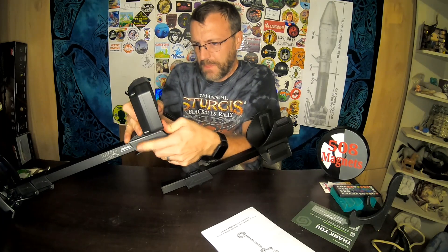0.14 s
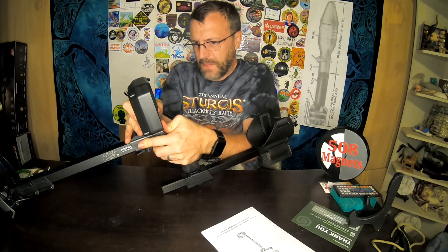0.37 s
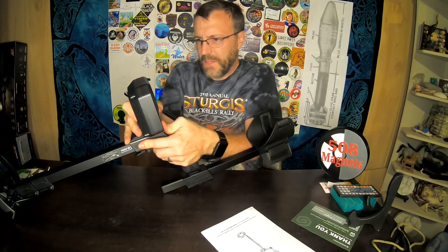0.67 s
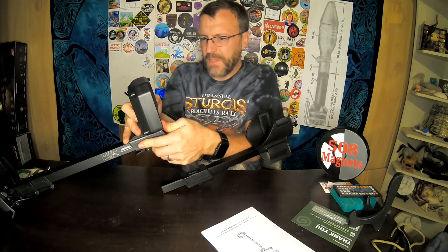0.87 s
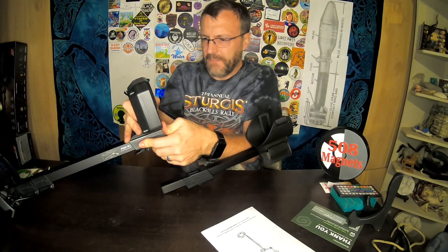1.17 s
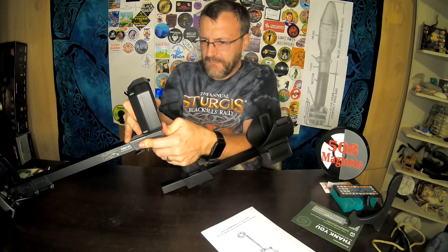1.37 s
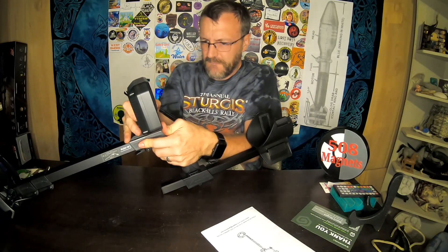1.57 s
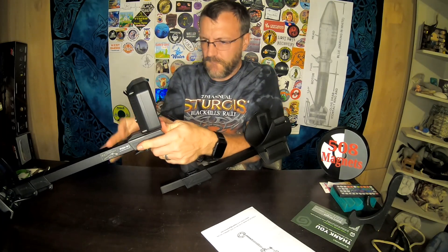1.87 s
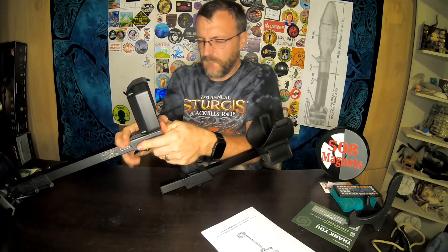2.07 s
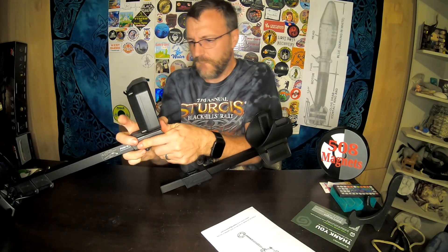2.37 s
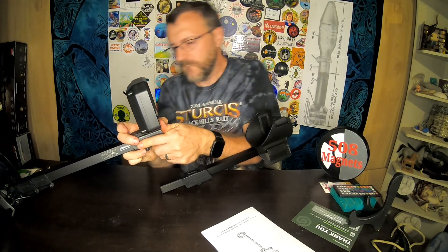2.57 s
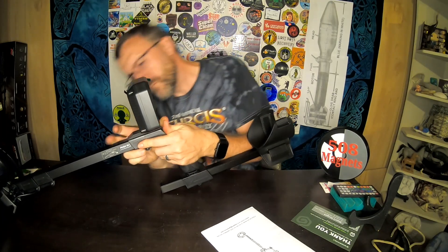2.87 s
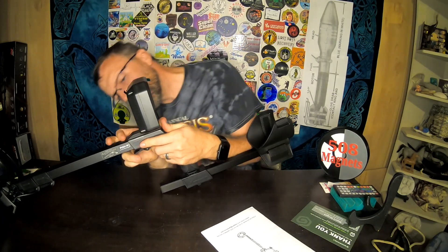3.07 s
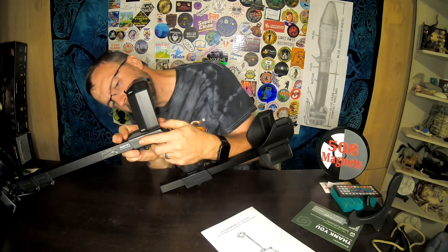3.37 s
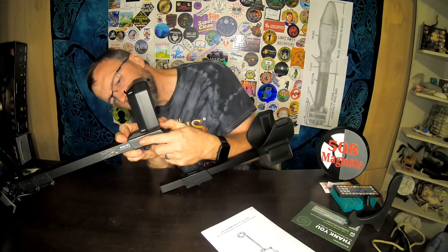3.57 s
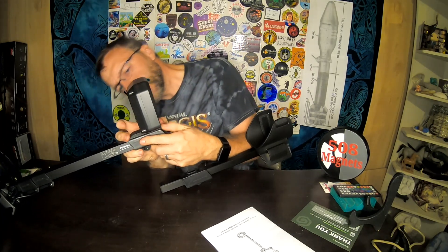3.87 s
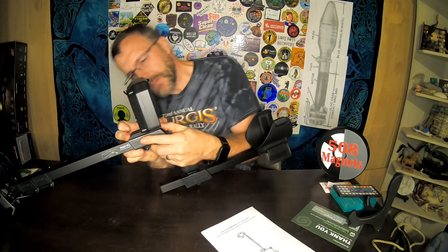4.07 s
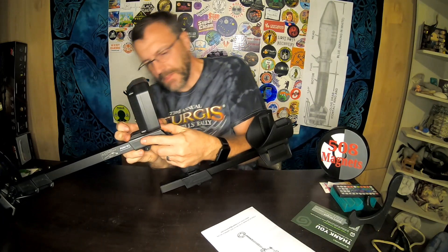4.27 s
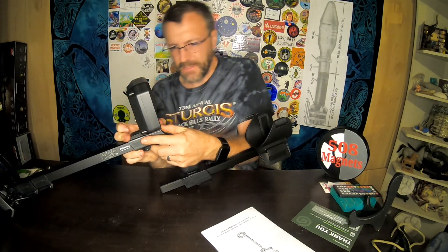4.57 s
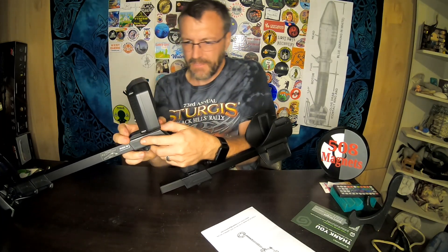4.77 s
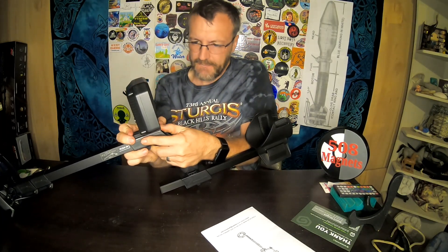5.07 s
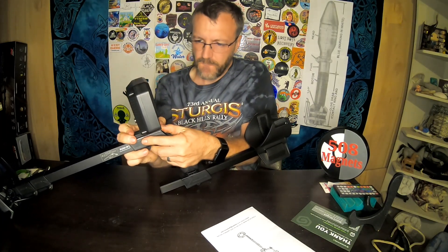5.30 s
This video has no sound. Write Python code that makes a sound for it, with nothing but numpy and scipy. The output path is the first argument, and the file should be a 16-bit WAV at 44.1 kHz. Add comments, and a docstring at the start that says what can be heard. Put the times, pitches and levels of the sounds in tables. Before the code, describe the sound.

Close stereo pickup of a small, quiet room with a short tail, faint noise floor and uneven low rumble. Hands work a hard plastic housing along a shaft above a wooden desk. Faint ticks begin at 0.1 s, with a soft dull desk bump and scuff around 0.35 s. Bright plastic snaps hit at 0.53-0.55 s, and another at 0.71 s. Sparse light clicks and grainy finger rubbing follow from 0.9 to 1.8 s. At 2.07-2.35 s the shell creaks in a rapid stutter of tiny clicks, with skin hiss and a low desk hum. Small ticks and rubs cluster from 2.4 to 3 s, then a brighter scuff at 3.05 s. A very brief, faint squeak comes near 3.4 s, followed by little taps and catches until 4 s. At 4.2 s a loud woody knock with a plastic snap dominates. Faint ticks, drags and desk touches continue from 4.7 to about 5.3 s.

```python
"""A small quiet room: hands work a hard plastic housing along a shaft above a wooden desk.
The shell ticks, snaps and creaks as short bursts of ringing modes, each tapping the desk; one desk knock is loud.
Fingers rub over the plastic as patchy hiss, with a brief squeak and grainy drags; each push makes the desk hum.
A close pair of microphones hears it with a short room tail, over a low rumble and a faint noise floor."""
import sys
import numpy as np
from scipy import signal
from scipy.fft import rfft, irfft
from scipy.io import wavfile
from scipy.ndimage import uniform_filter1d

SR = 44100
rng = np.random.default_rng(int(sys.argv[2]) if len(sys.argv) > 2 else 0)


def digitize_waveform(pressure):
    """Quantize a signal to 16-bit integers and store it at the path in sys.argv[1].

    Rows of a 2-D input are taken as channels; values are limited to [-1, 1].
    """
    field = np.atleast_2d(pressure).T
    bounded = np.clip(field, -1, 1)
    quanta = np.round(bounded * 32767).astype(np.int16)
    wavfile.write(sys.argv[1], SR, quanta)


def volts(x):
    """Linear amplitude factor 10**(x/20) for a level x in dB, scalar or array-like."""
    e = np.asarray(x, float) / 20
    return 10 ** e


N = 239771  # length in samples

# ringing modes of the plastic shell: pitch_hz, relative level_db, t60_s of a free ring
SHELL_MODES = [(1300, -2, .018), (2150, -2, .007), (2620, -1, .009), (3250, -4, .006), (4000, -4, .006),
               (4800, -3, .006), (5700, -9, .004), (6700, -10, .005), (9700, -20, .004)]
# ringing modes of the desk top: pitch_hz, relative level_db, t60_s of a struck ring
DESK_MODES = [(52.5, -6.5, 0.083), (84.7, -7.5, 0.11), (174, 0, 0.13), (192, 6.5, 0.073), (210, -1, 0.052),
              (263.4, 8, 0.068), (348, 8, 0.034), (404.5, 0, 0.063), (435, -7, 0.056), (591, -11.5, 0.066),
              (728, 6.5, 0.015), (880, 3, 0.017), (1055, -5, 0.026), (1480, -3.5, 0.013)]
STROKE_RISE_DB_PER_S, SCUFF_FADE_DB_PER_S = 224, 263.5


def evened(x):
    """Scales to rms 1."""
    return x / np.sqrt(np.mean(x ** 2) + 1e-20)


def read(points, hz):
    """A table value on a log-frequency axis."""
    f, value = np.transpose(points)
    return np.interp(np.log(hz + 1), np.log(f + 1), value)


def add(mix, s, sound):
    """Mixes a sound in at a time in seconds."""
    part = mix[round(s * SR):][:len(sound)]
    part += sound[:len(part)]


def level(rows):
    """A dB curve as a gain for every sample."""
    return volts(np.interp(np.arange(N) / SR, *np.transpose(rows)))


def gestures(rows, rise_db, fade_db):
    """A gain for every sample: each gesture swells, holds and fades at steady dB per second; powers add."""
    t = np.arange(0, N / SR + .002, .001)
    start, held, db = np.transpose(rows)[:, :, None]
    before, after = np.maximum(start - t, 0), np.maximum(t - start - abs(held), 0)
    slope = rise_db * before + fade_db * after
    return np.interp(np.arange(N) / SR, t, np.linalg.norm(volts(db - slope), axis=0))


def ring(modes, extra_db, detune, size, cycles=0.016, order=1):
    """Sines that build up over some cycles and die away; little is radiated under the lowest."""
    hz, db, t60 = np.transpose(modes)[:, :, None]
    t = np.arange(size) / SR
    build_up = (1 - np.exp(-hz * t / cycles)) ** order
    swing = volts(db + extra_db[:, None] - 60 * t / t60) * build_up
    sound = (swing * np.sin(2 * np.pi * hz * detune[:, None] * t)).sum(0)
    return signal.lfilter(*signal.butter(2, hz.min(), "high", fs=SR), sound)


def pair(magnitude, length, size):
    """Two-channel noise of a given short-time magnitude, alike between the microphones by band."""
    # diffuse sound: pitch_hz, left-right likeness (0 to 1)
    likeness = [(60, .95), (130, .99), (350, .98), (500, .2), (1500, .4), (4000, .2), (12000, .1)]
    hop = size // 4
    hz, frames = np.fft.rfftfreq(size, 1 / SR), length // hop + 5
    a, b, c, d = rng.standard_normal((frames, len(hz), 4)).T
    same = np.clip(read(likeness, hz), -1, 1)[:, None]
    left, other = a + 1j * b, c + 1j * d
    z = np.array([left, same * left + np.sqrt(1 - same ** 2) * other])
    z = z * magnitude(hz[:, None], np.arange(frames) * hop / SR)
    return evened(signal.istft(z, nperseg=size, noverlap=size - hop)[1][:, :length])


def ticks():
    """Each tick rings the shell for a few cycles, most near its centre, and taps the desk.
    Returns what the microphones face, and the blurred crack that all sides together send to the walls."""
    # ticks of the shell: start_s, peak_db, centre_hz of the ring,
    # treble_db (-19 leaves the shell's own balance), desk_db (tap peak relative to the tick)
    single = [(0.1047, -47, 2380, -16, -6), (0.1665, -46.5, 2080, -13, -9), (0.2432, -55, 4370, 0.5, -15),
              (0.3044, -55.5, 2800, -20, -5), (0.3381, -42, 4270, -39, -0.5),
              (0.5292, -28, 3020, -8, -25.5), (0.5457, -21.5, 2730, -6.5, -36),
              (0.6802, -46.5, 3960, -7, -11.5), (0.714, -28.5, 2930, -28, -22),
              (0.9038, -52, 2240, -15, -24), (0.919, -47.5, 2210, -31, -16), (1.1028, -45, 2460, 0, -5.5),
              (1.1328, -48, 2060, -51, -32), (1.1476, -39.5, 2150, -20, -9.5),
              (1.3198, -52, 1300, -38, -3.5), (1.7221, -41, 2400, -8, -9), (1.7912, -45, 3000, -19, -30),
              (2.4116, -50, 2360, -44, -15), (2.5191, -46.5, 2110, -19.5, -9.5),
              (2.5654, -48.5, 2580, -18, -12.5), (2.6319, -43.5, 2110, -14, -8),
              (2.663, -38, 2250, -12, -15.5), (2.7411, -48, 1940, -13, -38), (2.83, -48, 3240, -17, -7),
              (2.8583, -42, 2330, -12, -14.5), (2.9275, -51.5, 2560, -37, -8),
              (2.9852, -51, 2470, -17, -11), (3.688, -49.5, 2160, -22, -5.5), (3.7489, -48, 2280, -9, -5),
              (3.981, -51, 4530, -5, -10), (3.9957, -39.5, 3180, -12.5, -14.5),
              (4.2156, -24.5, 2400, -16.5, -2), (4.7059, -48.5, 4200, -44, -7),
              (4.7322, -46.5, 1960, -5, -7.5), (4.8302, -51, 4970, 0, -9), (4.8464, -42, 3030, 0.5, -15.5),
              (4.911, -52, 4200, -3, -15), (4.966, -55, 4900, -19, 1), (5.102, -54.5, 5800, -4, -22)]
    # a creak, the shell slipping along the shaft step by step: start_s, peak_db
    creak = [(2.0735, -51), (2.0845, -55), (2.1283, -45), (2.1443, -44), (2.1565, -43), (2.1664, -45),
             (2.1764, -43), (2.1874, -44), (2.2028, -43), (2.2263, -40), (2.2583, -41), (2.2842, -43),
             (2.3418, -51)]
    creak_tone = (2200, -70, -12)  # centre_hz, treble_db, desk_db
    rows = [tuple(row) for row in single] + [(*row, *creak_tone) for row in creak]
    wall_focus = 0.38  # share of the ring's peak (in dB) left in the diffuse crack
    wall_db_per_db = 0.1263  # hard snaps radiate wider

    near, walls = np.zeros(N), np.zeros(N)
    hz, shell_db, _ = np.transpose(SHELL_MODES)
    bins = np.fft.rfftfreq(512, 1 / SR)
    # a contact is a quick uneven chatter (1 ms decay) after the first blow
    fade = np.exp(-np.arange(300) / SR / .001)
    contact = .09 * fade * rng.standard_normal((len(rows), 300)) + (np.arange(300) == 0)
    chance = rng.standard_normal((len(rows), 2, len(hz)))
    for (s, db, centre_hz, treble_db, desk_db), (spot, detune), touch in zip(rows, chance, contact):
        near_db = 8.0 * np.exp(-(np.log(hz / centre_hz) / .17) ** 2)
        tilt_db = (treble_db + 19.0) * np.maximum(np.log2(hz / 2700), 0) ** 2 / 3.62
        tilt_db = tilt_db + .35 * (db + 20) * (hz < 1500)  # only hard snaps bend the broad faces
        sound = ring(SHELL_MODES, near_db + tilt_db + 1.5 * spot, 1 + .03 * detune, size=500, cycles=1.5)
        sound = np.convolve(sound, touch)
        sound = volts(db) * sound / abs(sound).max()
        # the crack follows the modes' outline without their separate rings
        outline = np.transpose([hz, shell_db + wall_focus * near_db + tilt_db])
        dip = (8000, outline[-1, 1] - 8)
        spectrum_db = read([(600, -40), *outline[:-1], dip, outline[-1], (15000, -45)], bins)
        crack = np.roll(irfft(volts(spectrum_db)), 40)
        crack = crack * np.linalg.norm(sound) / np.linalg.norm(crack)
        tap = desk_ring(6.0, db + desk_db, .6)
        add(near, s, sound)
        add(walls, s, volts(wall_db_per_db * (db + 38.0)) * crack)
        add(near, s, tap)
        add(walls, s, volts(5.0) * tap)
    return near, walls


def desk_ring(light_db, peak_db, contact_ms):
    """The desk top struck once: it dips away first, and its low modes swell late; light taps skip the low modes."""
    octaves = np.log2(np.minimum(np.transpose(DESK_MODES)[0], 750) / 750)
    modes = ring(DESK_MODES, light_db * octaves, np.ones(len(DESK_MODES)), size=14000, cycles=1.51, order=3)
    blow = np.hanning(round(contact_ms * SR / 1000) + 3)
    sound = -np.convolve(blow, modes)
    return volts(peak_db) * sound / abs(sound).max()


def knocks():
    """Contacts that ring only the desk."""
    # knocks on the desk: start_s, peak_db, light_db (lost per octave under 750 Hz), contact_ms
    blows = [(0.336, -33.5, -3.0, 2.1), (0.343, -47, 12, 1), (0.355, -46, 10.5, 0.62),
             (0.366, -40, -11.5, 4.7), (0.412, -39.5, -12.5, 2.3), (0.5463, -34.5, 9.5, 0.087),
             (0.679, -48, 19.5, 2.43), (3.504, -50.5, 2.5, 0.6), (3.581, -46.5, 0, 0.31),
             (3.797, -40, -5, 0.14), (4.203, -35.5, 10.5, 0.83), (4.215, -10.5, 7.5, 1.01),
             (4.2207, -17.5, 1.5, 0.89), (4.237, -20, -6, 2.23), (4.698, -63, 17, 0.58),
             (4.9643, -45.5, 26.5, 1.47), (5.205, -51, 4.5, 1.2), (5.323, -52.5, 23, 1.9)]
    out = np.zeros(N)
    for s, db, light_db, contact_ms in blows:
        add(out, s, desk_ring(light_db, db, contact_ms))
    return out


def drags():
    """The shell drags along the shaft in dense tiny slips, each ringing one mode, most strongly near 2300 Hz."""
    # drags: start_s of full pressure, held_s, level_db
    pulls = [(1.11, 0.072, -67.5), (2.81, 0.065, -68), (4.695, 0.029, -70), (4.82, 0.092, -72.5),
             (5.32, 0.01, -74.5)]
    slips_per_s, spread_db, dull_db_per_octave = 1100, 3, -6
    slip = rng.random(N) < slips_per_s / SR
    size = volts(spread_db * np.minimum(rng.exponential(1, N), 4)) * slip
    which = rng.integers(0, len(SHELL_MODES), N)
    t, out = np.arange(500) / SR, np.zeros(N)
    for k, (hz, db, t60) in enumerate(SHELL_MODES):
        mode_db = db + dull_db_per_octave * abs(np.log2(hz / 2300))
        tone = volts(mode_db - 120 * t / t60) * np.sin(2 * np.pi * hz * t)  # the grip halves the ring
        out += signal.oaconvolve(size * (which == k), tone)[:N]
    return gestures(pulls, STROKE_RISE_DB_PER_S, SCUFF_FADE_DB_PER_S) * evened(out)


def squeak():
    """A short squeaky rub: fast irregular slips, as noise, ring a few resonances."""
    # squeak resonances: pitch_hz, relative level_db, t60_s
    resonances = [(1090, 14.5, 0.069), (3100, 15, 0.0065), (4200, 17, 0.0019), (4600, 13, 0.0051)]
    start_s, end_s, squeak_db = 3.365, 3.455, -65
    out, size = np.zeros(N), round((end_s - start_s) * SR)
    body = ring(resonances, np.zeros(len(resonances)), np.ones(len(resonances)), size=1500)
    sound = evened(np.convolve(rng.standard_normal(size), body)[:size])
    add(out, start_s, volts(squeak_db) * sound * signal.windows.tukey(size, .4))
    return out


def rubbing():
    """Fingers slide and catch on the plastic: hiss in small drifting patches, roughened by tiny slips."""
    # skin on plastic: pitch_hz, relative density_db per Hz
    skin = [(530, -51.5), (900, -9), (1310, -4.5), (2400, -7), (3500, -6.5), (4600, -7), (5600, -5.5),
            (6660, -4.5), (7700, -16), (9590, -11), (11600, -29.5), (13800, -40), (15000, -60)]
    # fingers slide over the plastic: start_s of full pressure, held_s, level_db
    strokes = [(0, 0.0054, -70), (.49, 0.0072, -72), (1.11, 0.049, -68.5), (1.73, 0.2, -63),
               (2.15, 0.013, -56.5), (2.25, 0.033, -60.5), (2.67, 0.5, -74), (2.86, 0.11, -64),
               (3.11, 0.18, -71), (3.88, .7, -79.5), (4.7, 0.0035, -67), (4.81, 0.11, -72),]
    # a finger or part catches the plastic, a sudden scuff that fades: start_s, level_db
    catches = [(.338, -62.5), (0.812, -71), (0.923, -66), (1.329, -60.5), (3.05, -53), (3.43, -68),
               (3.51, -65), (3.584, -63), (3.794, -61.5), (2.37, -62.5), (5.105, -71.5)]
    stroke_fade_db_per_s, scuff_rise_db_per_s = 147.5, 1499
    patches = rng.standard_normal((N // 64 + 5, 129)).T
    patches = evened(uniform_filter1d(uniform_filter1d(patches, 4, 0), 14, 1))
    hiss = pair(lambda hz, t: volts(read(skin, hz) + 2.2 * patches), N, size=256)
    grit = volts(1.7 * evened(uniform_filter1d(rng.standard_normal(N), 100)))
    slides = gestures(strokes, STROKE_RISE_DB_PER_S, stroke_fade_db_per_s)
    scuffs = gestures([(s, 0, db) for s, db in catches], scuff_rise_db_per_s, SCUFF_FADE_DB_PER_S)
    sharp = evened(signal.lfilter([1, -.6], 1, hiss))  # a catch is brighter than a slide
    return slides * evened(hiss * grit) + scuffs * evened(sharp * grit)


def desk_hum():
    """Uneven pushes of the hands shake the low modes of the desk, favouring the panel mode near 174 Hz."""
    # hands lean into the desk: start_s of full weight, held_s, level_db ahead of the final low cut
    leans = [(0, 0.0028, -50), (.13, 0.0016, -46.5), (.36, 0.014, -37.5), (.418, 0.0092, -48.5),
             (.5, 0.0072, -49), (.705, 0.0092, -54), (.84, .005, -58), (1.15, 0.033, -49.5),
             (1.74, 0.028, -48.5), (2.07, 0.08, -52.5), (2.17, 0.013, -35), (2.3, 0.04, -45),
             (2.54, 0.049, -55), (2.68, 0.0026, -48.5), (2.86, 0.024, -48), (3.19, 0.007, -63.5),
             (3.52, 0.059, -59), (3.8, 0.033, -48), (3.95, 0.34, -64.5), (4.65, 0.043, -63),
             (4.85, 0.0044, -59.5), (4.97, 0.085, -80), (5.2, 0.24, -63.5)]
    rise_db_per_s, fade_db_per_s = 394, 209.5
    unevenness = evened(uniform_filter1d(rng.standard_normal(N), 700))
    force = rng.standard_normal(N) * volts(0.96 * unevenness)
    soft = signal.lfilter(*signal.butter(2, 260, fs=SR), force)
    hz = np.transpose(DESK_MODES)[0]
    panel_db = 13.0 * (abs(np.log(hz / 168)) < .1) - 22 * (hz < 120)
    leant_on = [(f, db, 1.42 * t60) for f, db, t60 in DESK_MODES]  # rings longer than when struck
    body = ring(leant_on, panel_db, np.ones(len(hz)), size=10000)
    hum = gestures(leans, rise_db_per_s, fade_db_per_s) * evened(signal.oaconvolve(soft, body)[:N])
    return signal.sosfilt(signal.butter(6, 130, "high", fs=SR, output="sos"), hum)


def room(x, wet_db, early_db):
    """A dense tail, each band dying at its own speed; early_db lifts its first few milliseconds."""
    # decay of the room: pitch_hz, t60_s
    decay = [(200, 0.27), (700, 0.26), (2000, 0.35), (5000, 0.27), (10000, 0.21)]
    t = np.arange(SR // 2) / SR
    tail = pair(lambda hz, t: volts(-60 * t / read(decay, hz)), SR // 2, size=256)
    tail = tail * np.clip((t - .002) / 0.00099, 0, 1)  # silent for 2 ms, then in over 1 ms
    tail = tail * (1 + volts(early_db) * np.exp(-t / .005))
    return volts(wet_db) * signal.fftconvolve(x[None], tail / np.linalg.norm(tail[0]), axes=1)[:, :N]


def sway():
    """A slow rumble, mostly under 70 Hz, that comes and goes in lumps."""
    # level of the low rumble: time_s, level_db
    lumps = [(0.0, -70), (0.42, -56.5), (0.87, -77), (1.09, -67), (1.83, -70.5), (2.21, -62), (2.3, -68),
             (2.73, -77), (3.14, -63), (3.64, -101.5), (3.81, -65), (4.01, -71), (4.83, -87.5), (4.96, -54),
             (5.22, -68), (5.43, -56)]
    rumble = [(12, -3.5), (28, 10.5), (50, -2.0), (75, -36.5), (100, -75.5)]  # pitch_hz, relative level_db
    return level(lumps) * pair(lambda hz, t: volts(read(rumble, hz)), N, size=8192)


def floor():
    """The quiet air of the room and the hiss of the microphones, as steady shaped noise."""
    # colour of the floor: pitch_hz, relative density_db per Hz
    air = [(15, -18), (25, -12), (53, 9), (95, -82.5), (139, -3), (176, 7), (286, -3), (543, -13),
           (856, -5.5), (1180, -17.5), (6370, -28.5), (9770, -34.5), (15000, -36)]
    return volts(-66.5) * pair(lambda hz, t: volts(read(air, hz)), N, size=2048)


def scene():
    """Contacts and their room tails, then the rubbing, the hum and the background."""
    near, walls = ticks()
    rub = squeak() + drags()
    desk = knocks()
    # ticks, drags and squeak return strongest at first, the knocks almost without early lift
    tails = room(walls + rub, wet_db=-0.5, early_db=13.0)
    tails = tails + room(desk, wet_db=-4.5, early_db=-19.0)
    return near + rub + desk + tails + desk_hum() + rubbing() + sway() + floor()


def band_limit(x):
    """A steep low-pass at the top of the band."""
    return signal.sosfilt(signal.butter(12, 15290, fs=SR, output="sos"), x)


def record(dry):
    """The two microphones differ a little in colour, the right 0.7 samples late."""
    # microphone colour: pitch_hz, left minus right in dB
    colour = [(40, -.8), (180, .6), (350, .4), (800, 3), (2500, .6), (8000, -.6)]
    hz = np.fft.rfftfreq(N, 1 / SR)
    half = volts(read(colour, hz) / 2) * np.exp(1j * np.pi * hz * .7 / SR)  # half the difference to each side
    top = 1 / np.sqrt(1 + (hz / 11000) ** 8)  # the capsules fall off steeply at the top
    mix = irfft(rfft(dry) * top * np.array([half, 1 / half]), N)
    return band_limit(mix)


dry = scene()
out = record(dry)
digitize_waveform(out)
```